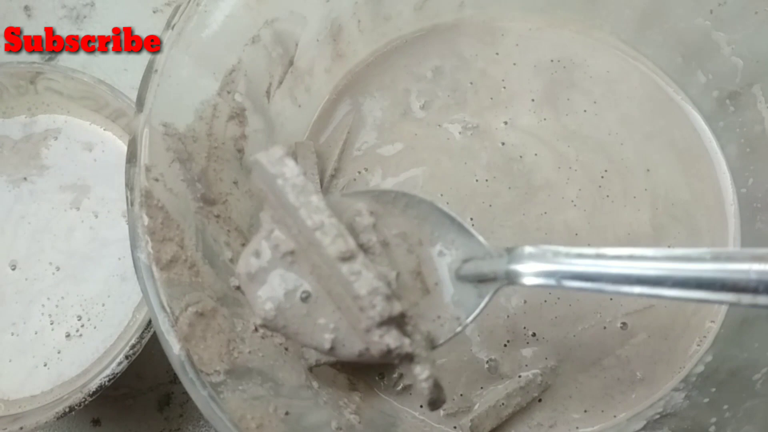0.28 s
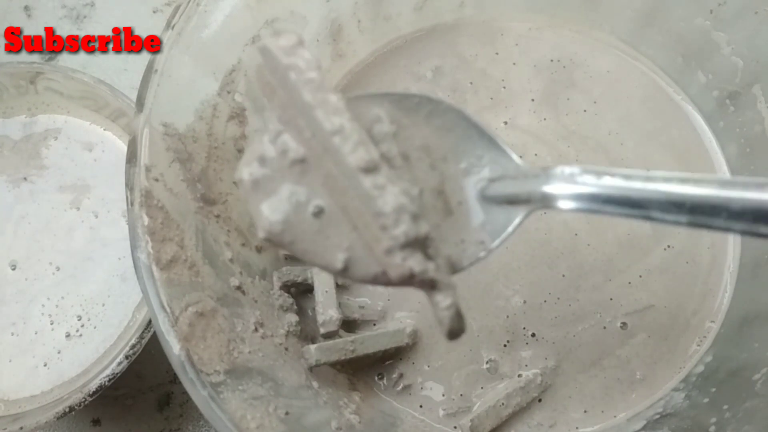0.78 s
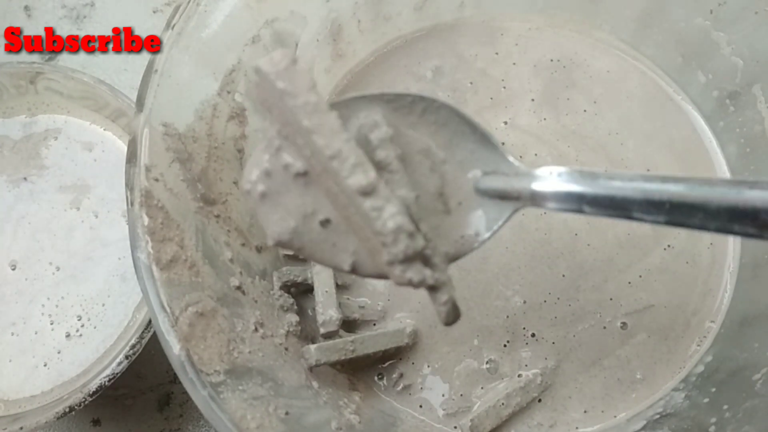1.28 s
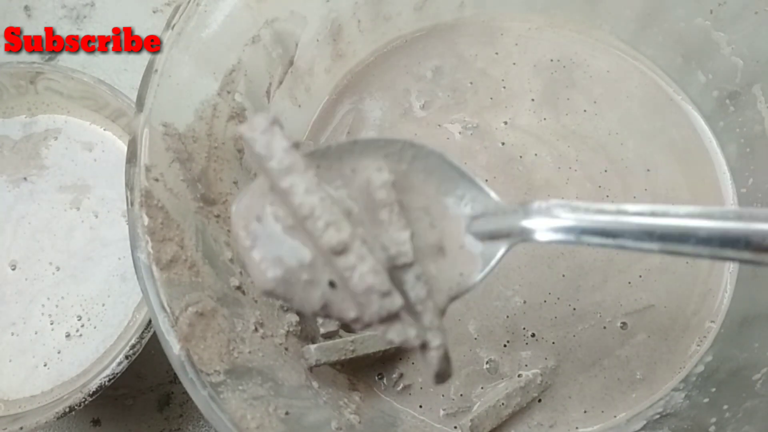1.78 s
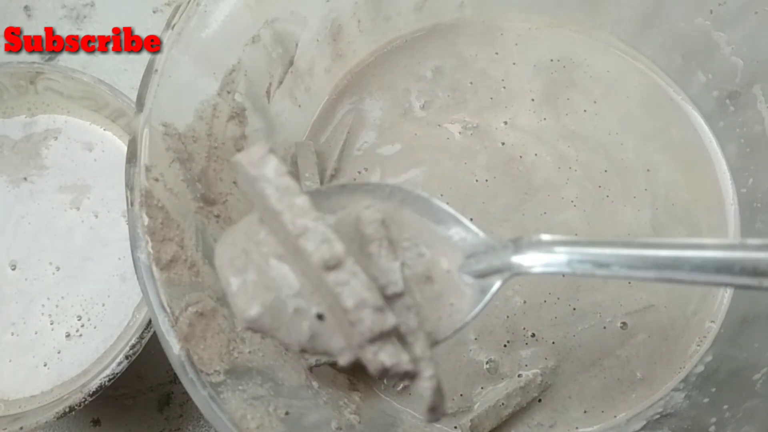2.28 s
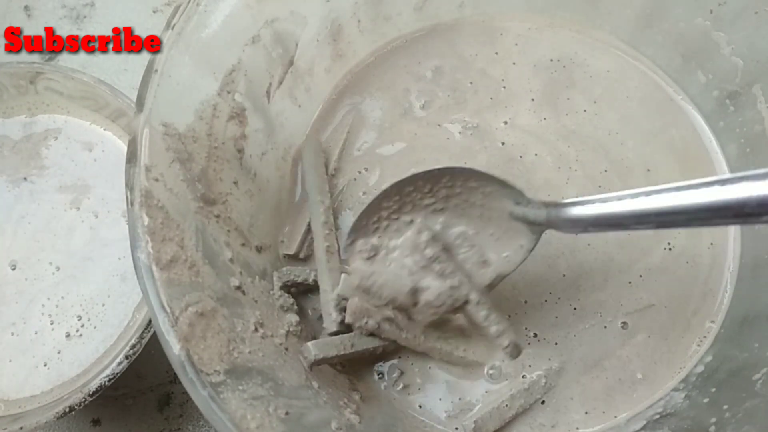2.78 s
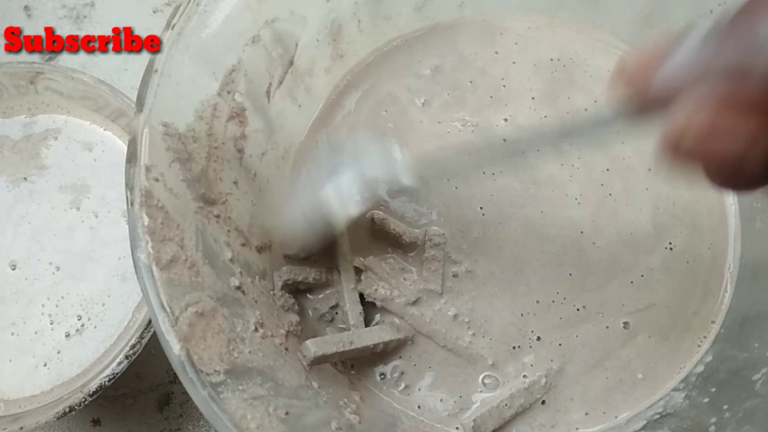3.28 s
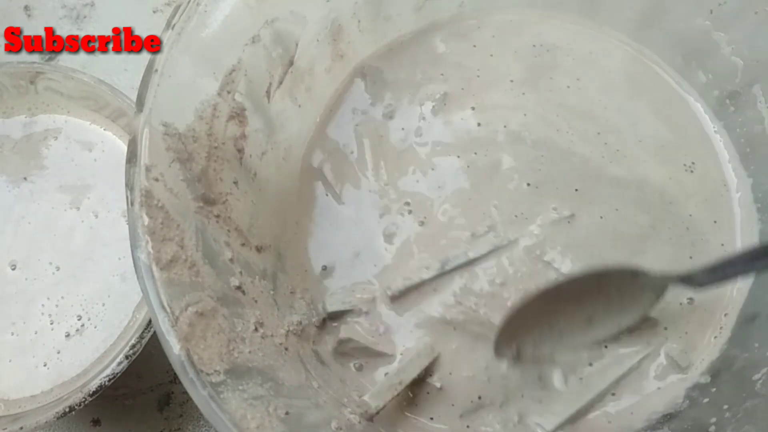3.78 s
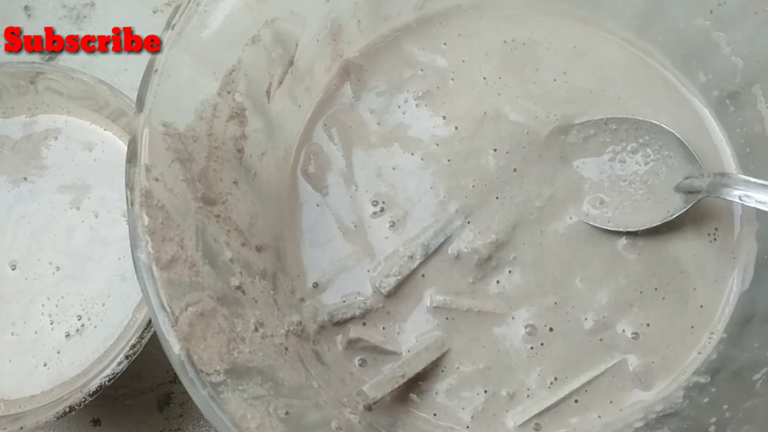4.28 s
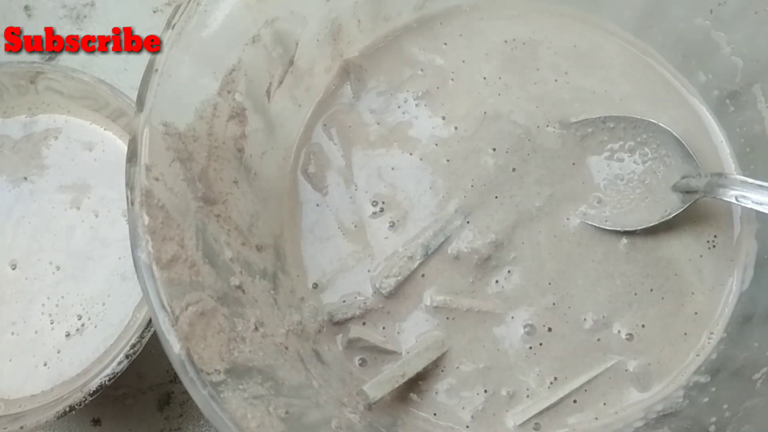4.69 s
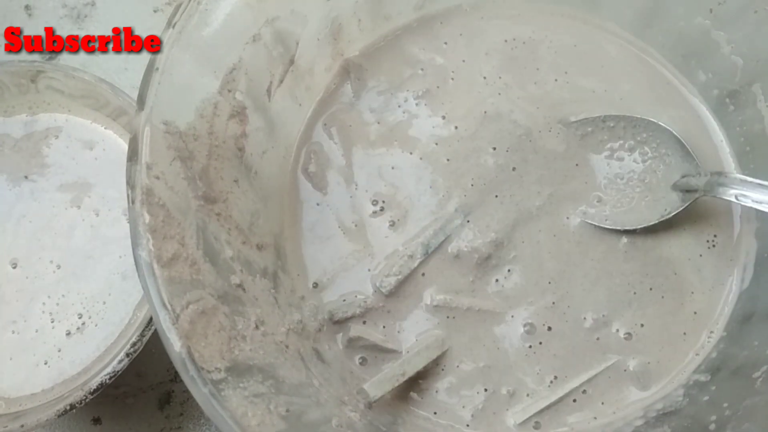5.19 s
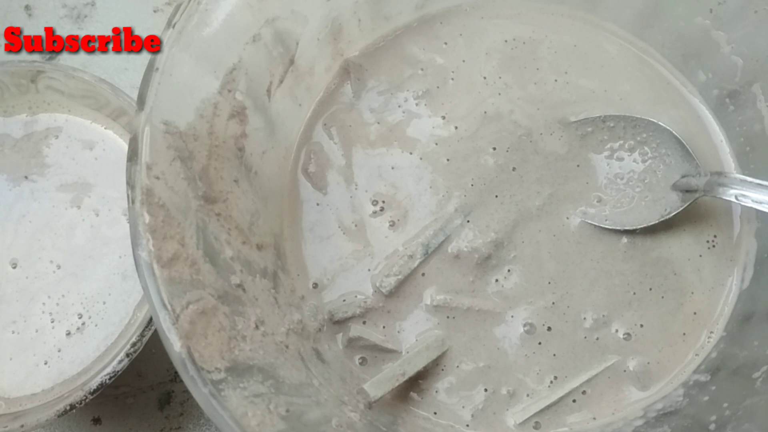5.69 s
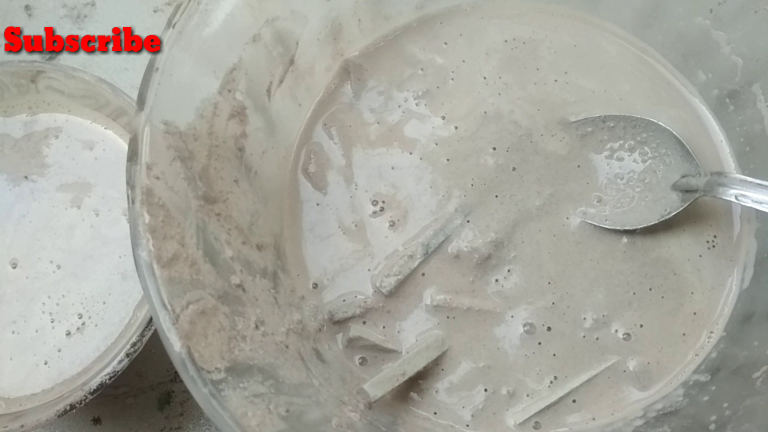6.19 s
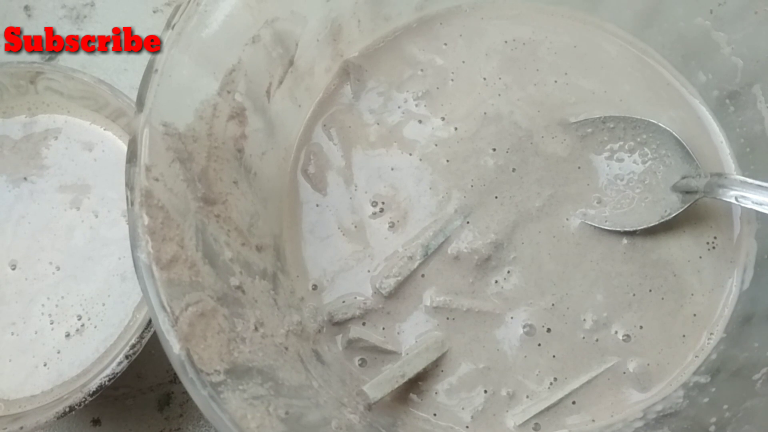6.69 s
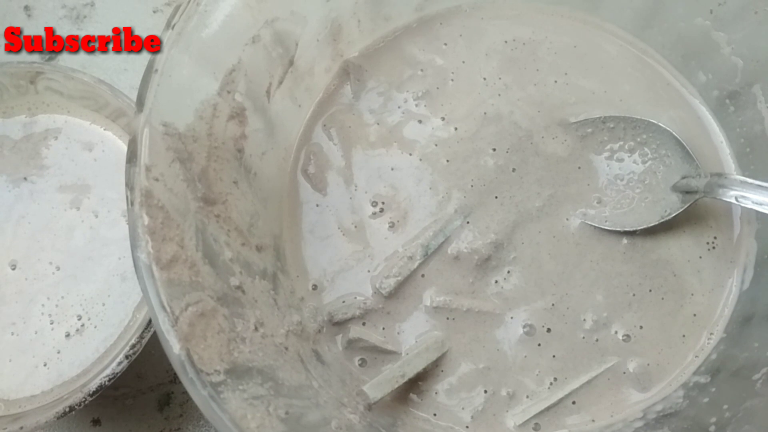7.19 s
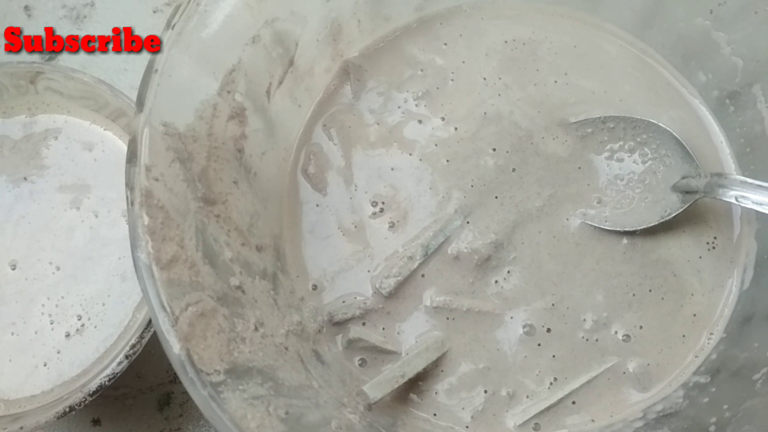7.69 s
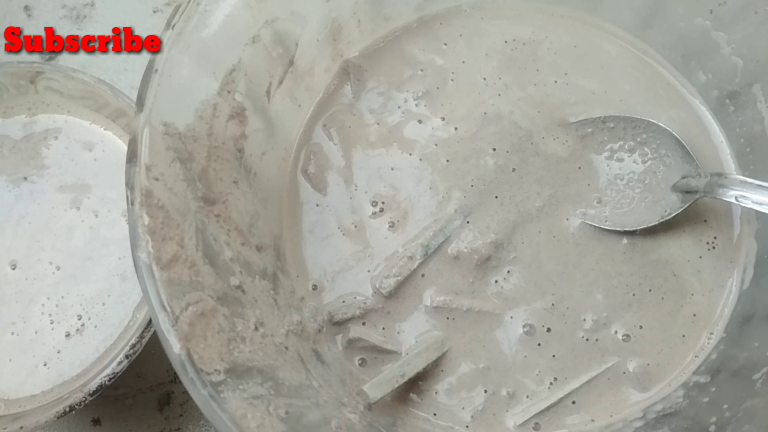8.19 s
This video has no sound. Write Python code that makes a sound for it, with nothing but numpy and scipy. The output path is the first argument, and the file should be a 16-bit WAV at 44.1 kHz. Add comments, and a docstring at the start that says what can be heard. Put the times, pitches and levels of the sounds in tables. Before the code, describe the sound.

A spoon works thick chalky slurry in a glass bowl, close and fairly dry. After a nearly still start with a faraway horn, wet gritty strokes lead to a sharp clink with a dull bowl note, more smearing and a rapid clattering clink. Sparse, thin chalk ticks and dry scrapes follow, then two woody table knocks, short juddering drags and a low closing thump, over soft room rumble and airy hiss.

```python
"""Low notes and snaps open the scene at a glass bowl of slurry, over a low rumble; far off a horn and a moan sound.
A steel spoon lifts wet chalk sticks, tips them back, knocks the glass and is laid down with a rattle of ringing modes.
Then dry chalk is handled beside the bowl: ringing ticks, scrapes of grainy noise, a double knock,
and something dragged over the table in bursts of resonant noise. A fine background hiss swells with the handling."""
import sys
import numpy as np
from scipy import signal
from scipy.fft import rfft, irfft
from scipy.io import wavfile
from scipy.ndimage import uniform_filter1d

SR = 44100
rng = np.random.default_rng(int(sys.argv[2]) if len(sys.argv) > 2 else 0)


def master_out(mix):
    """Clip the mix to full scale and print it as 16-bit PCM to the path in sys.argv[1]."""
    frames = np.transpose(np.atleast_2d(mix))
    ceiling = np.clip(frames, -1, 1)
    pcm = np.round(ceiling * 32767).astype(np.int16)
    wavfile.write(sys.argv[1], SR, pcm)


N = 372512

# Left-right levels are positive towards the left. Spectra are relative; each noise is scaled to an rms of 1.

# spoon against glass: (time [s], level [dB], relative bowl ring [dB], relative handle ring [dB], left-right [dB])
CLINKS = [(3.311, -19, -11, -21, -7), (3.317, -29, -5, -18, -7), (3.324, -36, -6, -7, -6),
          (3.331, -31, -5, -14, -6), (3.336, -36, -6, -2, -6), (3.3465, -29, -4, -7, -5),
          (3.774, -32, -2, -22, -4), (4.2905, -15.5, -6, -45, -9), (4.3065, -19, -6, -42, -8),
          (4.315, -26, -5, -36, -6), (4.323, -23, -6, -36, -5), (4.3312, -27, -5, -34, -4),
          (4.336, -25, -7, -34, -3)]
# crack of steel on glass, spectrum: (frequency [Hz], density [dB per Hz])
CRACK_SPECTRUM = [(200, -17), (1200, 3.5), (3000, -10), (5500, -4), (8500, -23), (10000, 21.5),
                  (12000, 13.5), (13200, 5), (15500, -14)]
# modes of the spoon's head: (frequency [Hz], level [dB], unchoked decay t60 [s])
SPOON_MODES = [(4694, -26, .1), (5600, -21, .1), (7720, -16, .12), (9540, -2, .09), (10100, 0, .08),
               (10770, -1, .08), (11560, -5, .06), (11930, -3, .08), (12100, -3, .08), (13720, -9, .09),
               (15300, -6, .1)]
# modes of the glass bowl: (frequency [Hz], level [dB], unchoked decay t60 [s])
BOWL_MODES = [(334, -13, .14), (408, -14, .16), (922, -12, .14), (1335, -13, .09), (2238, -8, .14),
              (2853, -21, .1)]
# modes of the spoon's handle: (frequency [Hz], level [dB], decay t60 [s])
HANDLE_MODES = [(3939, 0, .09), (4230, -3, .015), (5808, -8, .05), (7720, -13, .06)]
HEAD_DAMPED_S, BOWL_DAMPED_S = .024, .038  # time until the ring is choked

# chalk sticks touching: (time [s], level [dB], time until the ring is damped [s], left-right [dB])
TICKS = [(3.8005, -27, .008, 5), (3.842, -32, .007, 5), (5.026, -36, .007, 7), (5.147, -42, .015, 4),
         (5.312, -42, .012, 4), (5.4405, -27, .045, 8), (5.827, -33.5, .012, 4), (5.9105, -35, .02, 8),
         (6.0635, -29.5, .01, 8), (6.0805, -29, .015, 7), (6.121, -35, .007, 6), (7.514, -38, .012, 10),
         (7.5315, -39, .015, 4)]
# modes of a chalk stick: (frequency [Hz], level [dB], undamped decay t60 [s])
CHALK_MODES = [(9060, -14, .09), (9420, -11, .1), (12100, -18, .1), (14550, 0, .1), (14700, -5, .06),
               (15100, -8, .04)]
# sharp snaps and pops, some of them the bright edge of a knock:
# (time [s], snap level [dB], snap t60 [s], fizz level [dB], fizz t60 [s], left-right [dB])
POPS = [(0.0182, -43, 0.033, -49, 0.14, -3), (0.822, -50.5, 0.014, -52, 0.24, -8),
        (1.531, -57, 0.029, -54, 0.21, -6.5), (1.9328, -30, 0.0066, -68, .03, -6),
        (2.4986, -34, 0.023, -44, .04, -3), (4.8123, -46, 0.024, -53, 0.15, -7),
        (6.204, -36.5, 0.023, -36, 0.075, -5), (6.3254, -25.5, 0.017, -42, 0.026, 2.5),
        (6.3508, -28, 0.027, -37, 0.031, 2.5)]
# snap of a pop, spectrum: (frequency [Hz], density [dB per Hz])
SNAP_SPECTRUM = [(500, -9.5), (2500, -13), (5000, -4), (7500, 2), (10500, 7), (13500, 6.5), (15500, -9)]
# gritty strokes: (time [s], length scale [s], level [dB], share of dry chalk [0-1], left-right [dB])
SCRAPES = [(2.537, 0.034, -33, 0, -2), (2.685, 0.029, -35, 0.6, -2), (3.039, 0.1, -44, 0.15, -4),
           (3.77, 0.023, -30, 0, -1), (4.023, 0.038, -39, 0.4, -1.5), (5.669, 0.063, -48, 0.5, -3),
           (5.824, 0.039, -38, 0.99, -1), (6.05, 0.066, -36, 0.97, 1.5), (7.526, 0.019, -40.5, 1, 2),
           (7.858, 0.044, -38, 0.3, -3)]
# wet grit, spectrum: (frequency [Hz], density [dB per Hz])
WET_GRIT_SPECTRUM = [(400, -5.5), (2500, -1), (7500, 2.5), (10300, 13), (12000, 14.5), (13500, 9),
                     (15500, 8)]
# dry grit, spectrum: (frequency [Hz], density [dB per Hz])
DRY_GRIT_SPECTRUM = [(2000, -35), (7500, -13), (9300, 3), (10200, 11), (11200, -19), (12700, 3),
                     (14500, 13), (15500, -7)]

# dull knocks in the bowl:
# (time [s], level [dB], t60 [s], factor on the knock's pitch, relative ring [dB], left-right [dB])
BOWL_KNOCKS = [(0.0198, -31, .011, 1.4, -26, -2), (0.0265, -35, .014, .85, -21, -1),
               (0.058, -38, .014, .8, -20, 1), (2.79, -36, .016, 1.5, -5, -2),
               (3.313, -40, .03, 1, -5, 0.5), (3.348, -36, .025, .65, -7, -4),
               (3.774, -36, .04, 1.1, -14, 2.5), (4.29, -41, .1, 1, -8, 1)]
# knocks on the table:
# (time [s], level [dB], t60 [s], factor on the knock's pitch, relative ring [dB], left-right [dB])
TABLE_KNOCKS = [(6.3239, -30, .02, .65, -15, 2), (6.326, -37, .11, 1.1, -18, 2),
                (6.3503, -22.5, .04, 1, -13.5, 2.5), (7.881, -40, .02, .45, -24, 0),
                (7.9412, -33.5, .05, .97, -13, 3)]
# wooden knock at a pitch factor of 1, spectrum: (frequency [Hz], density [dB per Hz])
WOOD_SPECTRUM = [(120, -23), (400, -7.5), (800, -6), (1350, 11.5), (2400, 0.5), (3400, -6), (4500, -4),
                 (5800, -28), (8000, -8), (15000, -50)]
# modes of the tabletop: (frequency [Hz], level [dB], unchoked decay t60 [s])
TABLETOP_MODES = [(1098, -7, .11), (1330, 0, .13), (1640, -10, .06), (2220, -12, .07), (2548, -6, .07)]
# low notes of bowl and table as they rock and settle: (time [s], level [dB], frequency [Hz], t60 [s])
THUDS = [(0.03, -53.5, 396, 0.43), (0.058, -49.5, 333, 0.27), (3.374, -32, 394, 0.16),
         (3.38, -42, 337, 0.19), (3.402, -37, 408.6, 0.14), (3.38, -50, 203.8, 2),
         (4.182, -37.5, 390, 0.028), (7.943, -37, 175, 0.073), (7.97, -42, 210, .06),
         (8.008, -40, 150, 0.094)]

# judders, washes and low bumps of handling:
# (time [s], length scale [s], level [dB], factor on the judder's pitch)
JUDDERS = [(3.443, 0.097, -55, 1.27), (5.686, 0.017, -44.5, 0.93), (5.78, 0.045, -49.5, 0.22),
           (6.916, 0.018, -40.5, 0.99), (6.96, 0.019, -39, 0.94), (7.004, 0.018, -35, 1),
           (7.059, 0.018, -42.5, 0.99), (7.726, 0.03, -49, 0.574), (7.855, 0.015, -48.5, 0.57),
           (7.88, 0.23, -53, 0.19), (7.882, 0.014, -54, 0.97)]
# judder at a pitch factor of 1, spectrum: (frequency [Hz], density [dB per Hz])
JUDDER_SPECTRUM = [(150, -34), (380, -16), (530, 7.5), (740, -18), (870, 6), (960, 13.5), (1100, -8.5),
                   (1700, -10), (3500, -26.5)]
# soft, broad scrapes: (time [s], length scale [s], level [dB])
RUBS = [(7.667, 0.041, -50), (7.897, 0.052, -51)]
# soft scrape, spectrum: (frequency [Hz], density [dB per Hz])
RUB_SPECTRUM = [(150, -13), (520, 8), (900, 0.5), (2700, -4), (3600, -14)]

# vigour of the handling: (time [s], vigour [dB])
VIGOUR = [(0.0, -57.5), (0.46, -60.5), (0.69, -68.5), (1.12, -65.5), (1.72, -72), (2.18, -58.5),
          (2.71, -45.5), (2.86, -51), (3.09, -52), (3.26, -56.5), (3.69, -53.5), (3.99, -47.5),
          (4.15, -52.5), (4.81, -59.5), (5.3, -63.5), (5.42, -61.5), (5.79, -53), (6.28, -50), (6.38, -54),
          (6.61, -59.5), (7.05, -49), (7.42, -63), (7.86, -47.5), (8.45, -51)]
BRISK_DB = -50  # vigour of brisk handling
# each layer's level in brisk handling [dB], and the dB it gains for every dB of vigour
HISS_DB, HISS_GROWTH = -46.5, 1.05
SMEAR_DB, SMEAR_GROWTH = -50.5, 1.6
SLOSH_DB, SLOSH_GROWTH = -65, 0.86
# fine background hiss, spectrum: (frequency [Hz], density [dB per Hz])
HISS_SPECTRUM = [(5400, -65), (7700, -17), (9000, -8.5), (10400, -2), (11800, -1.5), (13300, -5),
                 (15300, -4.5), (15900, -25)]
# hiss, left over right before its overall pan: (frequency [Hz], level difference [dB])
HISS_BALANCE = [(7000, -7.5), (10500, -8), (12000, -1.5), (14500, 3.5)]
# wet smear, spectrum: (frequency [Hz], density [dB per Hz])
SMEAR_SPECTRUM = [(500, -6.5), (1300, 1.5), (2200, 2), (5000, 3), (7500, 6.5), (10000, -15.5),
                  (15000, -7.5)]
# wetness of the work, as a gain on the smear: (time [s], level [dB])
WETNESS = [(.35, -0.5), (1.1, -11.5), (1.85, -3), (4.55, 0.5), (5.6, -8.5)]
# dragging coloured by the table, spectrum: (frequency [Hz], density [dB per Hz])
TABLE_SPECTRUM = [(120, -2.5), (280, 5.5), (430, -1.5), (560, 11.5), (720, -1.5), (930, 5), (1200, -6.5),
                  (1700, -7), (3000, -60)]
# single pushes of slurry or drags over the table: (start [s], length [s], level [dB])
DRAGS = [(2.197, 1, -70), (3.296, 0.2, -81), (4.099, 0.22, -61), (5.517, 0.94, -61.5), (6.548, 0.84, -54.5),
         (7.475, 0.8, -64)]
DRAG_ARCH = 3  # exponent that sharpens the middle of a drag

# far horn's harmonics: (time [s], levels of harmonics 1, 6, 7 and 8 [dB])
HORN_LEVELS = [(0.43, -68, -91, -76.5, -79), (0.72, -69.5, -83, -71.5, -74), (0.93, -74, -94, -78, -88),
               (1.02, -72, -81, -81, -77), (1.31, -67, -81, -72.5, -82), (1.52, -71.5, -108, -84, -87),
               (1.66, -87, -115, -105, -108)]
# limits of the horn's note: (start [s], end [s])
HORN_SPAN_S = (.385, 1.68)
HORN_HZ = 393
# faint falling moan far off
MOAN_START_S, MOAN_LENGTH_S, MOAN_ATTACK_S, MOAN_RELEASE_S = .69, 0.77, 0.051, 0.45
MOAN_HZ, MOAN_FALL_HZ, MOAN_DB = 532, 143, -64.5
# faint gliding whistles: (time [s], length [s], start frequency [Hz], end frequency [Hz], level [dB])
WHISTLES = [(5.719, 0.21, 7300, 6420, -55), (7.654, 0.18, 7600, 6540, -54.5)]
# low rumble of room and table: (time [s], level before a fixed lift of RUMBLE_LIFT_DB [dB])
RUMBLE_LEVEL = [(0.0, -61), (2.3, -62), (2.9, -59), (5.0, -60), (6.9, -64.5), (7.5, -77.5), (7.75, -64),
                (7.98, -58.5), (8.3, -67.5)]
RUMBLE_LIFT_DB = 1.0
# rumble, spectrum: (frequency [Hz], density [dB per Hz])
RUMBLE_SPECTRUM = [(12, -87.5),  (20, -12), (92, -0.5), (205, -6.5), (248, -13.5), (310, -11), (357, -13),
                   (440, -18), (614, -42), (900, -25.5), (1170, -66), (1980, -120)]
# decay of the room: (frequency [Hz], t60 [s])
ROOM_T60 = [(200, 0.63), (1500, 0.29), (5000, 0.41), (14000, 0.18)]
# likeness of the left and right noise: (frequency [Hz], correlation [0-1])
LIKENESS = [(60, 0.91), (300, 0.89), (700, 0.68), (2000, 0.32), (5000, 0.023), (12000, 0.074)]
EDGE_HZ = 15800  # upper band limit of the recorder


def spoon():
    """Impact excitation: each contact cracks and rings head, handle and bowl; slurry chokes head and bowl."""
    out = handle()
    for s, db, bowl_db, _, pan_db in CLINKS:
        sound = gain_of(0.3) * burst(CRACK_SPECTRUM, t60=0.012)
        sound += gain_of(-13.3) * ring(SPOON_MODES, HEAD_DAMPED_S)
        sound += gain_of(bowl_db - 13.5) * ring(BOWL_MODES, BOWL_DAMPED_S)
        add(out, s, gain_of(db) * placed(sound, pan_db))
    return out


def handle():
    """Energy storage: every contact feeds the handle's modes, which sing on between contacts."""
    t, energy, out = np.arange(N) / SR, np.zeros(N), np.zeros((2, N))
    for s, db, _, handle_db, _ in CLINKS:
        energy[round(s * SR)] = gain_of(db + handle_db) ** 2
    for hz, db, t60 in HANDLE_MODES:
        # energy decays at twice the rate of amplitude
        kept = np.exp(-2 * np.log(1000) / (t60 * SR))
        stored = signal.lfilter([1], [1, -kept], energy + 1e-20)
        amplitude = uniform_filter1d(np.sqrt(stored), size=48)
        phase = rng.uniform(0, 1.4, (2, 1))
        out += gain_of(db) * amplitude * np.sin(2 * np.pi * hz * t + phase)
    return out


def chalk_ticks():
    """Modes of small stiff bodies: hard chalk sticks tick against each other, and their ring is soon damped."""
    out = np.zeros((2, N))
    for s, db, damped_s, pan_db in TICKS:
        tick = gain_of(-3) * ring(CHALK_MODES, damped_s) + gain_of(-6) * burst(DRY_GRIT_SPECTRUM, t60=.018)
        add(out, s, gain_of(db) * placed(tick, pan_db))
    return out


def pops():
    """Transients: sharp snaps and pops, some of them the bright edge of a knock, leave a short fizz."""
    out = np.zeros((2, N))
    for s, snap_db, snap_s, fizz_db, fizz_s, pan_db in POPS:
        snap = gain_of(snap_db) * burst(SNAP_SPECTRUM, t60=snap_s)
        fizz = gain_of(fizz_db) * burst(HISS_SPECTRUM, t60=fizz_s)
        add(out, s, placed(snap + fizz, pan_db))
    return out


def scrapes():
    """Friction noise: a stroke over grit is a dense run of uneven grains; dry sticks sound thinner and higher."""
    out = np.zeros((2, N))
    for s, length, db, share, pan_db in SCRAPES:
        wet = noise_pair(WET_GRIT_SPECTRUM, size=SR // 2, grain_db=3.2)
        dry = noise_pair(DRY_GRIT_SPECTRUM, size=SR // 2, grain_db=2.5)
        share = np.clip(share, 0, 1)
        grit = np.sqrt(1 - share) * wet + np.sqrt(share) * dry
        add(out, s, gain_of(db) * placed(stroke(length) * grit, pan_db))
    return out


def knocks():
    """Struck bodies: a noisy blow rings the bowl or table; low damped notes follow the rocking and settling."""
    out, t = np.zeros((2, N)), np.arange(SR) / SR
    for blows, modes in ((BOWL_KNOCKS, BOWL_MODES), (TABLE_KNOCKS, TABLETOP_MODES)):
        for s, db, t60, pitch, ring_db, pan_db in blows:
            blow = burst(shifted(WOOD_SPECTRUM, pitch), t60)
            add(out, s, gain_of(db) * placed(blow + gain_of(ring_db) * ring(modes), pan_db))
    for s, db, hz, t60 in THUDS:
        envelope = decay(t, t60) * (1 - np.exp(-t / 0.0032))
        note = gain_of(db) * np.sin(2 * np.pi * hz * t) * envelope
        add(out, s, np.array([note, note]))
    return out


def judders():
    """Resonant noise: judders, washes and low bumps share two broad peaks; soft rubs are wide and grainy."""
    out = np.zeros((2, N))
    for s, length, db in RUBS:
        add(out, s, gain_of(db) * stroke(length) * noise_pair(RUB_SPECTRUM, size=SR // 2, grain_db=4.5))
    for s, length, db, pitch in JUDDERS:
        noise = noise_pair(shifted(JUDDER_SPECTRUM, pitch), size=SR // 2)
        add(out, s, gain_of(db) * placed(stroke(length) * noise, pan_db=0.0))
    return out


def rustle():
    """Noise follows activity: fine background hiss, wet smear and table-coloured drag swell with the handling."""
    vigour_db = curve(VIGOUR) - BRISK_DB

    hiss = patchy(noise_pair(HISS_SPECTRUM, grain_db=3.0), depth_db=3.0)
    hiss = hiss * flutter(rate_hz=34, depth_db=1.5)
    hiss = leaning(hiss, HISS_BALANCE) * gain_of(HISS_DB + HISS_GROWTH * vigour_db)

    smear = patchy(noise_pair(SMEAR_SPECTRUM, grain_db=2.5), depth_db=3.6)
    smear = smear * gain_of(SMEAR_DB + SMEAR_GROWTH * vigour_db + curve(WETNESS))
    smear = smear * flutter(rate_hz=12.4, depth_db=3.5)

    push = gain_of(SLOSH_DB + SLOSH_GROWTH * vigour_db)
    push = push + sum(gain_of(db) * swell(s, length) for s, length, db in DRAGS)
    drag = push * patchy(noise_pair(TABLE_SPECTRUM, grain_db=5), depth_db=2.2)
    drag = drag * flutter(rate_hz=40, depth_db=1.5)
    return placed(hiss, pan_db=-1.0) + placed(smear, pan_db=-1) + placed(drag, pan_db=-2.0)


def horn():
    """Harmonic series: a far horn holds one wavering pitch while its harmonics fade in and out."""
    angle = 2 * np.pi * np.cumsum(HORN_HZ * flutter(rate_hz=70, depth_db=0.045)) / SR
    rows, (start, end) = np.array(HORN_LEVELS), HORN_SPAN_S
    note = np.zeros(N)
    for column, harmonic in enumerate((1, 6, 7, 8), 1):
        level = gain_of(curve(rows[:, [0, column]])) * flutter(rate_hz=20, depth_db=2)
        note += level * np.sin(harmonic * angle)
    return note * held(start, end - start, attack=.04, release=.02)


def moan():
    """Frequency modulation: random pitch wavering roughens a far note that falls ever faster as it fades."""
    u = np.clip((np.arange(N) / SR - MOAN_START_S) / MOAN_LENGTH_S, 0, 1)
    hz = (MOAN_HZ - MOAN_FALL_HZ * u ** 2) * flutter(rate_hz=130, depth_db=0.8)
    angle = 2 * np.pi * np.cumsum(hz) / SR
    note = np.sin(angle) + gain_of(-13.5) * np.sin(2 * angle)
    return gain_of(MOAN_DB) * held(MOAN_START_S, MOAN_LENGTH_S, MOAN_ATTACK_S, MOAN_RELEASE_S) * note


def whistles():
    """Gliding tones: a sine sweeps between two pitches, blurred by random jitter of its frequency."""
    out = np.zeros((2, N))
    for s, length, start_hz, end_hz, db in WHISTLES:
        u = np.linspace(0, 1, int(length * SR))
        hz = start_hz + (end_hz - start_hz) * u + 1700 * rng.standard_normal(len(u))
        note = gain_of(db) * np.sin(np.pi * u) * np.sin(2 * np.pi * np.cumsum(hz) / SR)
        add(out, s, np.array([note, note]))
    return out


def rumble():
    """Background noise: low coloured noise, fairly steady but for a late dip and swell."""
    return gain_of(curve(RUMBLE_LEVEL) + RUMBLE_LIFT_DB) * noise_pair(RUMBLE_SPECTRUM)


def room(x):
    """Reverberation: the diffuse tail of a small hard room, whose decay time depends on frequency."""
    taps = noise_pair([(20, 0), (20000, 0)], size=SR // 2)
    taps[:, :150] = 0  # gap ahead of the tail
    hz, t, z = signal.stft(taps, SR, nperseg=256)
    fading = z * decay(t, read(ROOM_T60, hz)[:, None])
    tail = signal.istft(fading, SR, nperseg=256)[1]
    return signal.fftconvolve(x, tail / np.linalg.norm(tail[0]), axes=1)[:, :N]


def ring(modes, damped_s=0.92, spread_db=2):
    """Modal decay: dying sines are choked; level and phase vary with each blow and microphone."""
    t = np.arange(SR // 2) / SR
    out = np.zeros((2, len(t)))
    for hz, db, t60 in modes:
        phase = rng.uniform(0, 2 * np.pi) + min(hz / 2000, 1) * rng.standard_normal((2, 1))
        level = gain_of(db + spread_db * rng.standard_normal((2, 1)))
        out += level * decay(t, t60) * np.sin(2 * np.pi * hz * t + phase)
    return out * (1 - np.exp(-t / 0.00037)) * np.exp(-(t / damped_s) ** 2)


def burst(spectrum, t60):
    """Contact noise: coloured noise with a fast onset and an exponential decay."""
    t = np.arange(SR // 2) / SR
    return noise_pair(spectrum, size=len(t)) * decay(t, t60) * (1 - np.exp(-t / 0.0004))


def decay(t, t60):
    """Exponential damping: the amplitude falls by 60 dB in t60."""
    return np.exp(-np.log(1000) * t / t60)


def stroke(length):
    """Envelope of a short stroke: a quick rise and a rounded fall."""
    u = np.arange(SR // 2) / SR / length
    return (1 - np.exp(-u / 0.12)) * np.exp(-u ** 2)


def swell(start, length):
    """Envelope of one drag: a symmetrical arch."""
    u = np.clip((np.arange(N) / SR - start) / length, 0, 1)
    return (4 * u * (1 - u)) ** DRAG_ARCH


def held(start, length, attack, release):
    """Envelope of a held note: attack, hold, release."""
    t = np.arange(N) / SR - start
    return np.clip(t / attack, 0, 1) * np.clip((length - t) / release, 0, 1)


def flutter(rate_hz, depth_db):
    """Random modulation: low-passed noise makes a wavering gain with an rms of 1."""
    hz = np.fft.rfftfreq(N, 1 / SR)
    wander = irfft(rfft(rng.standard_normal(N)) / (1 + (hz / rate_hz) ** 2), N)
    return evened(gain_of(depth_db * evened(wander)))


def patchy(x, depth_db):
    """Band-wise modulation: narrow bands of a noise swell and fade, with neighbours blended."""
    z = signal.stft(x, nperseg=1024)[2]
    patches = uniform_filter1d(rng.standard_normal(z.shape[1:]), size=6, axis=0)
    patches = evened(uniform_filter1d(patches, size=7, axis=1))
    return evened(signal.istft(z * gain_of(depth_db * patches), nperseg=1024)[1][:, :N])


def noise_pair(spectrum, size=N, grain_db=0):
    """Partial coherence: two partly alike noises are made of grains of uneven size."""
    grains = gain_of(grain_db * np.minimum(rng.exponential(1, size), 6))
    a, b = rfft(rng.standard_normal((2, size)) * grains)
    same = np.clip(read(LIKENESS, np.fft.rfftfreq(size, 1 / SR)), 0, 1)
    return coloured(irfft([a, same * a + np.sqrt(1 - same ** 2) * b], size), spectrum)


def coloured(x, spectrum):
    """Spectral shaping: filters noise to a spectrum and an rms of 1."""
    size = x.shape[-1]
    return evened(irfft(rfft(x) * gain_of(read(spectrum, np.fft.rfftfreq(size, 1 / SR))), size))


def shifted(spectrum, pitch):
    """Frequency scaling: moves a whole spectrum by one factor."""
    return [(hz * pitch, db) for hz, db in spectrum]


def placed(pair, pan_db):
    """Stereo level and time differences: the right channel lags if pan_db exceeds 3, otherwise the left."""
    late = int(pan_db > 3)
    pair = np.array(pair)
    pair[late] = np.pad(pair[late], (11, 0))[:pair.shape[1]]  # 11 samples, 0.25 ms
    return pair * gain_of([[pan_db / 2], [-pan_db / 2]])


def leaning(pair, balance):
    """Frequency-dependent level difference: shares a sound between the microphones."""
    lean_db = read(balance, np.fft.rfftfreq(N, 1 / SR))
    return irfft(rfft(pair) * gain_of([lean_db / 2, -lean_db / 2]), N)


def add(mix, s, sound):
    """Superposition: adds a sound to the mix at time s."""
    part = mix[:, max(round(s * SR), 0):][:, :sound.shape[1]]
    part += sound[:, :part.shape[1]]


def curve(rows):
    """Linear interpolation: a (time [s], level [dB]) table as dB for every sample."""
    return np.interp(np.arange(N) / SR, *np.transpose(rows))


def read(points, hz):
    """Interpolation of a table on a log-frequency axis."""
    f, value = np.transpose(points)
    return np.interp(np.log(hz + 1), np.log(f + 1), value)


def gain_of(db):
    """Logarithmic level: decibels to an amplitude factor."""
    return 10 ** (np.asarray(db) / 20)


def evened(x):
    """Normalisation to an rms of 1."""
    return x / np.sqrt(np.mean(x ** 2) + 1e-20)


def scene():
    """Direct and reverberant sound: the bowl is close and dry; things beside it carry more of the room."""
    near, sticks, table = spoon(), chalk_ticks() + pops() + scrapes(), knocks() + judders()
    wet = room(gain_of(-19) * near + gain_of(-3.0) * sticks + gain_of(-7.0) * table)
    background = rumble() + horn() + moan() + whistles()
    return near + sticks + table + wet + rustle() + background


def record(dry):
    """Band limitation: the recorder passes only what lies below EDGE_HZ."""
    lowpass = signal.firwin(401, EDGE_HZ, window=("kaiser", 8), fs=SR)
    return signal.oaconvolve(dry, lowpass[None], "same")


dry = scene()
out = record(dry)
master_out(out)
```